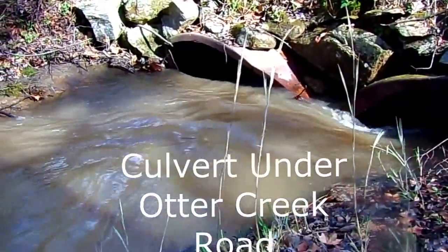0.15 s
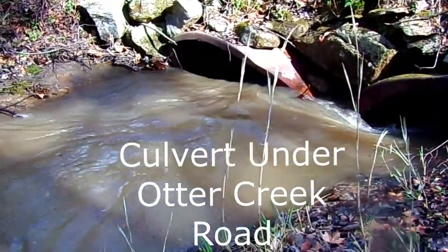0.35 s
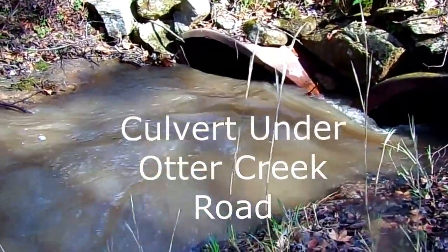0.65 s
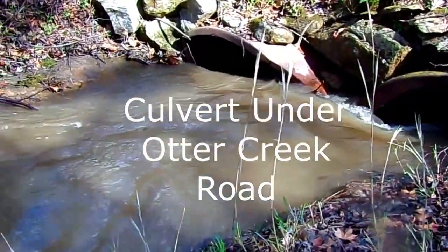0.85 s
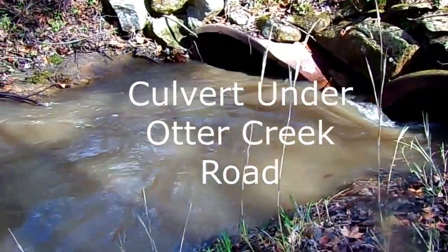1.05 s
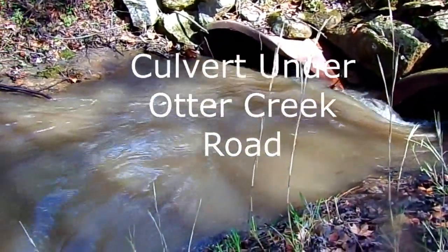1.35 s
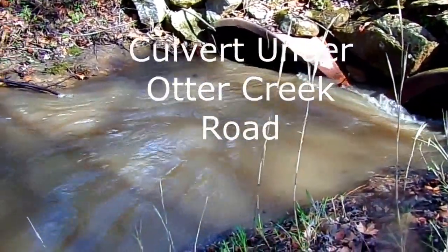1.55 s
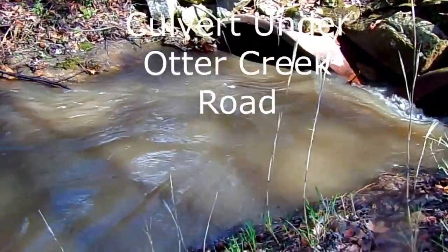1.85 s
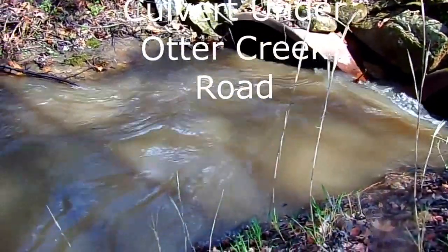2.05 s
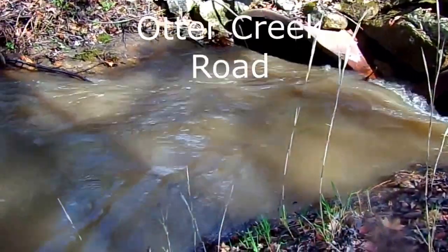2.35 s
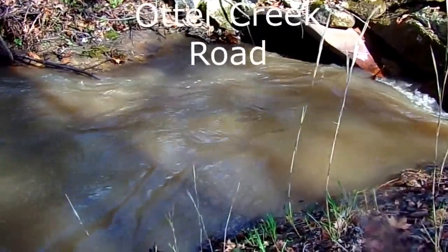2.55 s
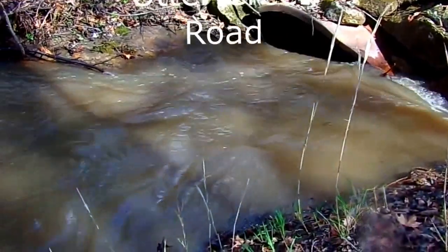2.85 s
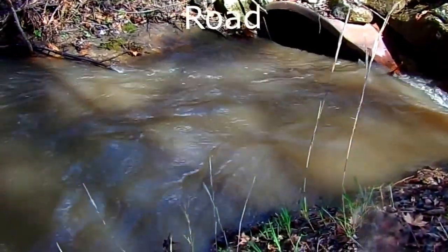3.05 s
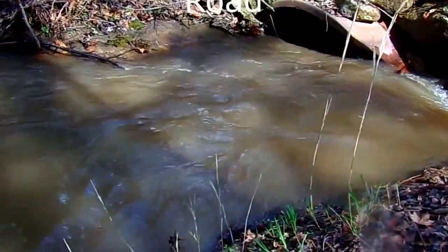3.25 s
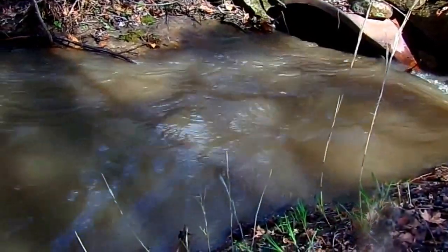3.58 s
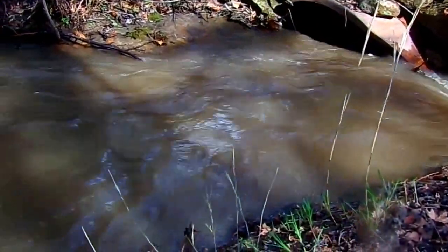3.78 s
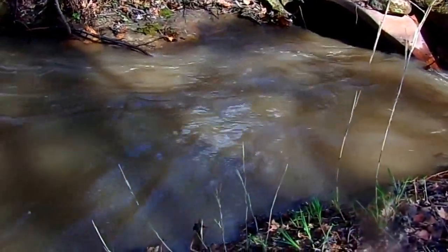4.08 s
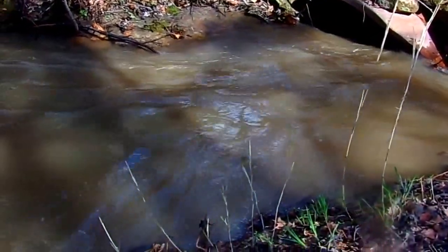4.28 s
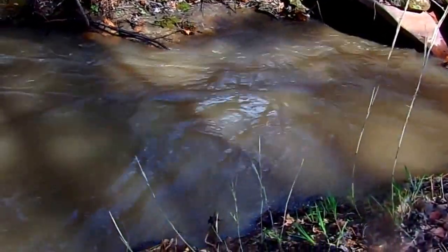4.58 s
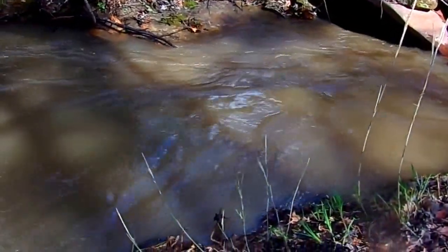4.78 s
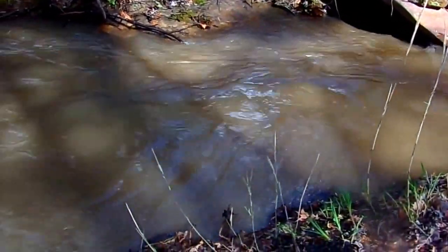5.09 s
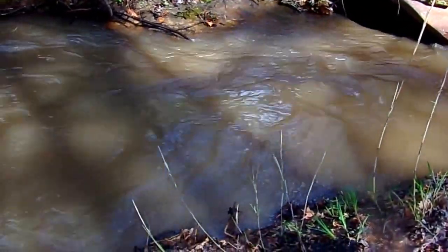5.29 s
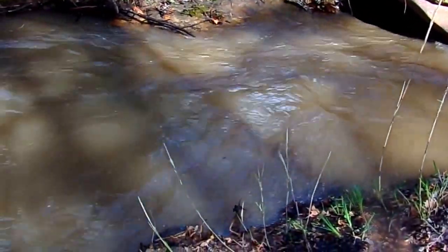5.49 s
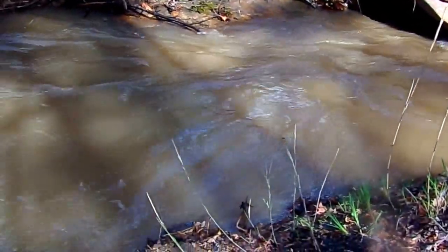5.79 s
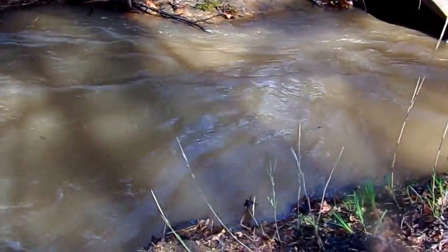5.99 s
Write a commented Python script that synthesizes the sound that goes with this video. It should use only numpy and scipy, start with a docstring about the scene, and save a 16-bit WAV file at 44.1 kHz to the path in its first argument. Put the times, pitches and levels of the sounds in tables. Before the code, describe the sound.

Outdoors beside a culvert, muddy creek water rushes without pause: a broad hiss with small bubbles and gurgles, gently swelling and shifting, slightly fuller from about 3.4 to 5.3 s. A small camera microphone makes it boxy and hollow, the same water in both channels. From 0 to 0.55 s, very loud dry digital crackles burst in clusters, mainly left with some right. From 0.55 to 0.9 s the left thins to a rasp with ticks, and a sharp pop hits both sides near 0.9 s. Raspy thinning returns around 1.35-1.6 s with a few ticks. Then mostly clear water, with a dull knock at 2.2 s and brief left flutters. Further soft knocks come at 3.7, 4.2, 4.8, 5.2 and 5.8 s. Left crackles recur at 4.2, 4.7, 5.0 and 5.2 s, then become dense and harsh from 5.75 s to the end, with right-side pops after 6 s.

```python
"""Creek at a culvert

Muddy creek water rushes out of a culvert pipe: hiss and bubbles follow a flow curve, heard by one
microphone in a small camera housing, which a few dull knocks reach. A faulty digital link copies the
sound to two channels and throws some samples to a large value, mostly of opposite sign: crackles and
pops left or right. Lost upper bits thin the left channel to a rasp."""
import sys
import numpy as np
from scipy import signal
from scipy.io import wavfile
from scipy.ndimage import uniform_filter1d

SR = 44100
rng = np.random.default_rng(int(sys.argv[2]) if len(sys.argv) > 2 else 0)


def inscribe(sig):
    """Save sig as 16-bit PCM at rate SR to the path in sys.argv[1].

    A 1-D sig is mono; a 2-D sig holds one channel per row.
    Samples are clipped to [-1, 1] before scaling.
    """
    pcm = np.round(np.clip(np.atleast_2d(sig).T, -1, 1) * 32767)
    wavfile.write(sys.argv[1], SR, pcm.astype(np.int16))


N = 270333


def gain_of(db):
    """Decibels to an amplitude factor."""
    return 10 ** (np.asarray(db) / 20)


def evened(x):
    """Scale to rms 1."""
    return x / np.sqrt(np.mean(x ** 2) + 1e-20)


def smooth_noise(shape, width):
    """Gaussian noise averaged over width samples along time, rms 1."""
    return evened(uniform_filter1d(rng.standard_normal(shape), size=width, axis=-1))


# knocks on the housing: start_s, level_db (before the housing colour), pitch_hz
KNOCK_HITS = [(2.1991, -17.5, 713), (3.6932, -20.5, 800), (4.201, -18, 775), (4.784, -17.5, 870),
              (5.166, -16.5, 700), (5.79, -16, 740)]


def knocks():
    """Each knock rings the hollow shell from an abrupt start, with a short noise rattle."""
    out, t = np.zeros(N), np.arange(900) / SR
    shell_60db_s, rattle_60db_s, rattle_db = .009, .03, -5
    for start_s, level_db, pitch_hz in KNOCK_HITS:
        noise = rng.standard_normal(len(t))
        shell = -np.sin(2 * np.pi * pitch_hz * t - .9) * gain_of(-60 * t / shell_60db_s)
        dull_noise = signal.lfilter([.5], [1, -.5], noise)
        rattle = gain_of(rattle_db - 60 * t / rattle_60db_s) * dull_noise
        out[round(start_s * SR):][:len(t)] += gain_of(level_db) * (shell + rattle)
    return out


def patches(noise, bins, frames):
    """Noise averaged over frequency bins and time frames, rms 1."""
    across_hz = uniform_filter1d(noise, size=bins, axis=0)
    return evened(uniform_filter1d(across_hz, size=frames, axis=1))


def wash():
    """White hiss of breaking water, swelling in drifting patches, slow clumps and brief wide flickers."""
    window, hop = 512, 128
    frames = N // hop + 5
    hz = np.fft.rfftfreq(window, 1 / SR)[:, None]
    real, imag, fine, slow, wide = rng.standard_normal((frames, window // 2 + 1, 5)).T
    fine = patches(fine, bins=5, frames=12)
    slow = patches(slow, bins=12, frames=60)
    wide = patches(wide, bins=60, frames=4)
    # the churning body is lumpier than the fine spray above it
    lumpy = 0.52 + 1 / (1 + (hz / 5000) ** 4)
    swell_db = lumpy * (1.1 * fine + 1.3 * slow) + .8 * wide
    spectrum = (real + 1j * imag) * gain_of(swell_db)
    return evened(signal.istft(spectrum, nperseg=window, noverlap=window - hop)[1][:N])


def bubbles(per_s=2500., cycles=11., spread_db=2.2, count=32):
    """Bubbles of many sizes ring as decaying sines of slightly rising pitch; a few are loud."""
    strength = gain_of(spread_db * np.minimum(rng.exponential(1, N), 5))
    strength = strength * (rng.random(N) < per_s / SR)
    kind, out = rng.integers(0, count, N), np.zeros(N)
    for k, hz in enumerate(np.geomspace(300, 4200, count)):
        turns = np.arange(0, 3 * cycles, hz / SR)
        envelope = np.exp(-2.2 * turns / cycles) * (1 - np.exp(-turns))
        ring = np.sin(2 * np.pi * turns * (1 + .006 * turns)) * envelope
        # equal energy per hertz: the housing colours all of them later
        ring = ring / np.linalg.norm(ring) * np.sqrt(hz)
        out += signal.oaconvolve(strength * (kind == k), ring)[:N]
    return evened(out)


# flow of the creek: time_s, level_db (before voices and housing), fizz_db, gurgle_db, splash_db (added)
FLOW_CURVE = [(0.0, -35.5, 2.5, -0.5, 5), (0.25, -33, -0.5, -0.5, 0), (0.6, -35, 2.2, 0, 2),
              (0.8, -35, 1.8, 2, 0), (1.08, -34, 0.8, 0.2, -3.5), (1.36, -34, 0.5, -2, -2),
              (1.7, -34, 1.9, 2.6, -1.5), (2.05, -33, -0.5, -4, -4), (2.6, -34, -0.5, 2.2, -1),
              (3.1, -35, 1.3, 1.2, -0.5), (3.4, -33, -2.1, -2.7, -2.5), (3.8, -32.5, -1, -0.2, -2),
              (4.2, -33, -1.2, -0.1, 1.5), (4.55, -32, -3.5, -2.5, -3.5), (4.9, -32.5, -1.5, -0.2, 0.7),
              (5.3, -33, -0.2, -1.2, 2), (5.62, -35, -1.5, -2, -3.5), (5.85, -35.5, -0.7, 1.8, 4.5),
              (6.13, -34, 0.5, -2, 3)]


def flow(column):
    """One column of the flow curve, interpolated to every sample."""
    rows = np.transpose(FLOW_CURVE)
    return np.interp(np.arange(N) / SR, rows[0], rows[column])


# bands of fizz, gurgle and splash, in the flow curve's order: low_hz, high_hz
VOICE_BANDS = [(6000, 15900), (1500, 2400), (2500, 5000)]


def creek():
    """Hiss and bubbles follow the flow; fizz, gurgle and splash bands swell and sink on their own."""
    water = evened(wash() + gain_of(-10.0) * bubbles())
    out = water
    for k, band_hz in enumerate(VOICE_BANDS):
        band_filter = signal.butter(2, band_hz, "band", fs=SR, output="sos")
        voice = signal.sosfiltfilt(band_filter, water)
        out = out + (gain_of(flow(2 + k)) - 1) * voice
    return gain_of(flow(1)) * out


def scene():
    """One sound field; both channels carry the same microphone."""
    return np.tile(knocks() + creek(), (2, 1))


# rush of water as the housing passes it, without the narrow dips: pitch_hz, density_db (per Hz, relative)
RUSH_COLOUR = [(40, -56), (100, -26), (200, -6), (1200, -8), (1600, 0.5), (1900, 3.5), (2200, -3),
               (2500, -12.5), (3300, -20), (4050, -26.5), (5100, -16), (5800, -10), (6900, -5.5),
               (8300, -10), (12000, -19), (14000, -30), (15700, -32)]
# cavities of the housing cancel narrow bands: centre_hz, width_hz, depth_db
CAVITY_DIPS = [(390, 90, 4), (1470, 200, 12), (1730, 200, 13), (2040, 160, 8), (2410, 200, 8),
               (3700, 500, 20), (4350, 400, 17), (4620, 300, 7), (5430, 700, 20), (6330, 900, 12),
               (7450, 650, 25), (8010, 400, 18), (11710, 550, 20), (14730, 600, 14)]


def housing(size=2 ** 13):
    """Causal response of microphone and housing: the phase follows from the log gain."""
    hz = np.abs(np.fft.fftfreq(size, 1 / SR))
    colour_hz, colour_db = np.transpose(RUSH_COLOUR)
    response_db = np.interp(np.log(hz + 1), np.log(colour_hz), colour_db)
    for centre_hz, width_hz, depth_db in CAVITY_DIPS:
        away = (2 * (hz - centre_hz) / width_hz) ** 2
        response_db = response_db + 10 * np.log10((gain_of(-2 * depth_db) + away) / (1 + away))
    log_gain = np.log(gain_of(response_db))
    phase = -signal.hilbert(log_gain).imag
    taps = np.fft.ifft(np.exp(log_gain + 1j * phase)).real[:size // 2]
    return taps / np.linalg.norm(taps)


# left channel loses its upper bits: start_s, length_ms, share (of samples hit, before the flicker)
BIT_LOSSES = [(0.545, 172, 0.55), (0.717, 128, 0.8), (0.845, 40, .3), (0.89, 40, .04), (1.09, 90, 0.018),
              (1.25, 80, 0.03), (1.345, 94, 0.36), (1.49, 90, 0.49), (2.618, 16, 0.14), (2.679, 28, 0.26),
              (2.74, 27.5, 0.45), (3.199, 28, 0.13), (3.25, 57, 0.024), (3.34, 40, 0.077), (3.38, 52, 0.43),
              (3.44, 126, 0.042), (3.65, 25, .06), (3.76, 98, .05), (3.88, 67, .12), (3.98, 64, 0.11),
              (4.04, 44, 0.83), (4.09, 240, 0.15), (4.62, 77, .1), (4.91, 40, .06), (4.95, 63, .3),
              (5.04, 175, 0.12), (5.28, 30, 0.21), (5.345, 38, 0.075), (5.383, 19, 0.96), (5.43, 20, 0.25),
              (5.49, 28, .06), (5.517, 17, .8), (5.538, 36, 0.089), (5.574, 28, 0.96), (5.602, 40, .12),
              (5.642, 118, 0.64), (5.94, 60, 0.93), (6.1, 30, 0.27)]
KEPT_DB = -42.5  # largest value that the lower bits can hold
NEGATIVE_SHARE = 0.83  # negative samples are hit less often
FLICKER = 2.2  # rms swing of the log odds of a hit


def lost_bits(x):
    """Hit samples of the left channel fold back into the small range of the lower bits."""
    left, right = x
    share, luck, kept = np.full(N, 1e-9), rng.random(N), gain_of(KEPT_DB)
    for start_s, length_ms, part in BIT_LOSSES:
        share[round(start_s * SR):][:round(length_ms * SR / 1000)] = part
    # the odds of a hit swing over a few milliseconds
    odds = share / (1 - share) * np.exp(FLICKER * smooth_noise(N, 300))
    hit = luck < odds / (1 + odds) * np.where(left < 0, NEGATIVE_SHARE, 1)
    folded = (left + kept) % (2 * kept) - kept
    return np.array([np.where(hit, folded, left), right])


# bad stretches of the link: start_s, length_ms, channel, size_db (of the wrong value, before scatter and waver),
# up_share (negative samples thrown up), down_share (positive thrown down), both before clumping
BAD_STRETCHES = [(0.032, 18, "left", -4.5, .21, 0.052), (0.0359, 5.3, "right", -3.5, .27, 0.029),
                 (0.0527, 33, "left", -3.5, 0.18, .03), (0.0814, 1.8, "right", 6.5, 0.25, 0.008),
                 (0.0899, 18.5, "left", -3.5, 0.24, 0.079), (0.1119, 11.6, "left", 4, 0.24, 0),
                 (0.1257, 34, "left", -2.6, 0.33, 0.19), (0.1552, 6.4, "left", -11, 0.29, .28),
                 (0.1625, 7.1, "left", -0.5, 0.28, 0.25), (0.1293, 3.4, "right", 6, 0.41, 0.33),
                 (0.1515, 3.5, "right", 0.5, 0.24, .1), (0.1674, 3.8, "right", -1.5, .26, 0.14),
                 (0.312, 15, "left", -2, .26, .22), (0.3157, 6.8, "right", -0.5, 0.25, 0.11),
                 (0.3293, 21, "left", -6.5, 0.33, 0.23), (0.3525, 13, "left", -4.5, 0.29, 0),
                 (0.431, 1.8, "left", -5.4, 0.12, 0), (0.4432, 16, "left", -3.5, 0.25, 0.076),
                 (0.4455, 1.0, "right", 1.5, 0.24, 0), (0.4729, 31.4, "left", -2.5, 0.29, 0.1),
                 (0.4957, 1.2, "right", -0.5, 0.23, 0.055), (0.507, 8.2, "left", -3.3, 0.42, 0.23),
                 (0.5092, 3.7, "right", -5, .19, .08), (0.5264, 14.2, "left", -1.7, .21, 0.29),
                 (0.5235, 5.4, "right", -2.8, 0.36, 0.11), (0.5303, 10, "right", 0.5, 0.26, 0.079),
                 (0.7093, 7.5, "left", -10.5, 0.363, .14), (0.8913, 0.45, "left", 5, .55, 0),
                 (0.8931, 2.7, "left", 1, .6, 0.55), (0.8964, 2.7, "left", 2, .35, 0),
                 (0.8931, 2.5, "right", 1, .5, .4), (0.8958, 2.9, "right", 1, .21, 0),
                 (1.5182, 0.87, "left", 0.5, .1, 0.012), (4.1617, 3.4, "left", 5, .08, 0),
                 (4.1699, 13.4, "left", -1.5, 0.27, 0.18), (4.2151, 5.9, "left", -4.5, 0.39, 0.038),
                 (4.277, 11.5, "left", 2, .02, 0.01), (4.3238, 8.9, "left", .5, 0.035, 0),
                 (4.6621, 3.2, "left", -1, 0.18, 0), (4.6675, 3, "left", -2, 0.12, 0.079),
                 (4.6783, 1.35, "left", .5, .12, 0), (4.9389, 3.7, "left", -3, 0.29, 0),
                 (5.0039, 10.4, "left", 2, 0.32, 0), (5.0175, 22.2, "left", -3, 0.34, 0.034),
                 (5.2178, 9.3, "left", 1, .4, 0), (5.2297, 12.5, "left", 3, 0.35, 0.016),
                 (5.241, 44, "left", -5, 0.34, 0.046), (5.7567, 5, "left", -2.5, 0.45, 0),
                 (5.7629, 13.5, "left", 1.6, 0.41, .31), (5.776, 8.2, "left", -0.5, 0.47, 0),
                 (5.786, 7.5, "left", 1, 0.56, 0), (5.8047, 12.7, "left", 6, 0.5, 0.29),
                 (5.812, 6.7, "right", 0, .05, 0), (5.8184, 42.7, "left", 6, 0.57, 0.25),
                 (5.86, 25, "left", -9, 0.37, .15), (5.8651, 1.6, "right", 1, 0.24, 0),
                 (5.883, 59, "left", -11.5, 0.29, 0), (5.9739, 9.7, "left", -11.5, 0.37, 0.07),
                 (5.9987, 7.1, "left", 8, 0.28, 0.046), (6.0061, 58, "left", -7, 0.29, 0.18),
                 (6.0087, 2.2, "right", 0, .31, .05), (6.0151, 7, "right", -10, 0.17, 0.011),
                 (6.0241, 24, "right", -0.5, 0.34, 0.054), (6.0667, 31.4, "left", -10.5, 0.39, 0.11),
                 (6.0705, 2.5, "right", -2, 0.21, 0.038)]
# lone wrong samples, each a dry tick: start_s, channel, direction, size_db (before the factor TICK_SIZE)
LONE_TICKS = [(0.06, "right", "up", 3), (0.1039, "right", "up", 2), (0.307, "left", "up", 3),
              (0.5028, "right", "up", 1.5), (0.595, "left", "up", 3), (0.603, "left", "up", -.3),
              (0.6173, "left", "up", -9), (0.6733, "left", "up", -7), (0.699, "left", "up", -6),
              (0.7012, "left", "up", -7), (0.705, "left", "up", -6), (1.2504, "right", "down", -6.5),
              (1.357, "right", "down", -12.3), (1.5125, "left", "up", 1), (1.536, "left", "up", -5),
              (3.4069, "right", "down", .6), (3.8374, "right", "down", -5.7), (4.0338, "left", "up", 4),
              (4.0351, "left", "up", 5), (4.0397, "left", "up", 2), (4.1876, "left", "up", -5),
              (4.2056, "left", "up", -3), (4.6615, "right", "down", .5), (4.9553, "left", "up", 3),
              (5.0424, "left", "up", 11), (5.8725, "right", "up", .3), (5.9562, "left", "up", -16),
              (5.9621, "left", "up", -11)]
TICK_SIZE = .8
WANDER_DB, STEADY_MS = 2, 10  # rms waver of the wrong value; well below STEADY_MS it nearly vanishes


def faulty_link(x, linger=.15, clumpy_db=4.5):
    """Some samples flip sign and jump to a large value; a stretch's first and last always jump up."""
    out, luck, scatter = lost_bits(x), rng.random(x.shape), rng.uniform(.6, 1, x.shape)
    # a slipped sample often drags the next one along
    luck = np.where(rng.random(x.shape) < linger, np.roll(luck, 1, axis=1), luck)
    # faults bunch into clumps under a millisecond long
    clumps = gain_of(clumpy_db * smooth_noise(x.shape, 24))
    luck = luck * clumps.mean() / clumps
    # the size of the wrong value wavers over a few milliseconds
    wander = smooth_noise(x.shape, 200)
    row = {"left": 0, "right": 1}
    for start_s, length_ms, channel, size_db, up_share, down_share in BAD_STRETCHES:
        start = round(start_s * SR)
        at = row[channel], slice(start, start + 1 + round(length_ms * SR / 1000))
        negative = x[at] < 0
        sign = np.where(negative, 1., -1.)
        hit = luck[at] < np.where(negative, up_share, down_share)
        sign[[0, -1]], hit[[0, -1]] = 1, True
        waver_db = WANDER_DB * wander[at] * (1 - np.exp(-(length_ms / STEADY_MS) ** 2))
        wrong = gain_of(size_db + waver_db) * scatter[at] * sign
        out[at] = np.where(hit, wrong, out[at])
    for start_s, channel, direction, size_db in LONE_TICKS:
        sign = 1 if direction == "up" else -1
        out[row[channel], round(start_s * SR)] = sign * TICK_SIZE * gain_of(size_db)
    return out


MIC_DB, EDGE_HZ = -0.47, 15750  # input gain; upper band limit


def record(dry):
    """Housing colour, the faulty link, full-scale clipping, then the band limit."""
    heard = gain_of(MIC_DB) * signal.oaconvolve(dry, housing()[None], axes=1)[:, :N]
    sent = np.clip(faulty_link(heard), -1, 1)
    band_limit = signal.firwin(1023, EDGE_HZ, window=("kaiser", 9), fs=SR)
    return signal.oaconvolve(sent, band_limit[None], "same")


dry = scene()
out = record(dry)
inscribe(out)
```